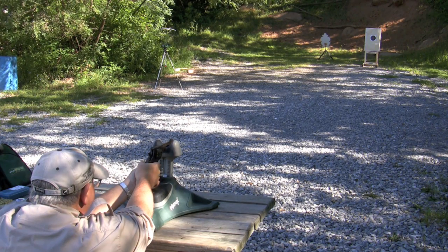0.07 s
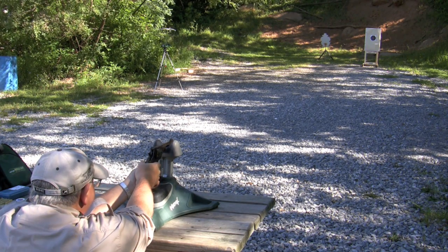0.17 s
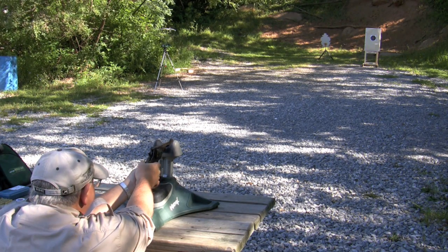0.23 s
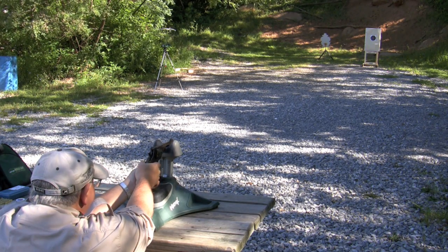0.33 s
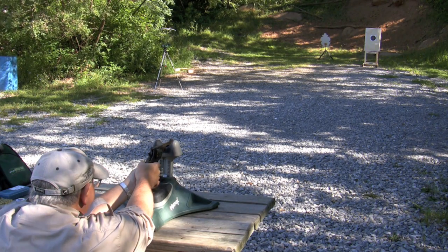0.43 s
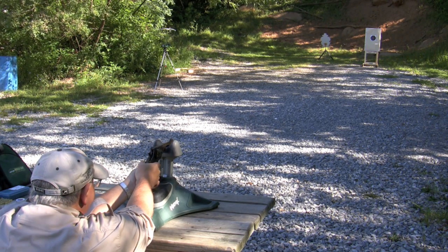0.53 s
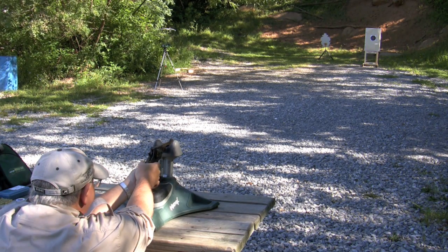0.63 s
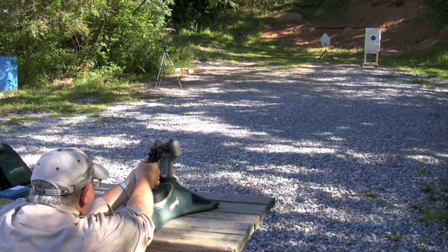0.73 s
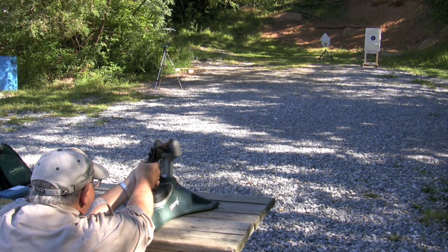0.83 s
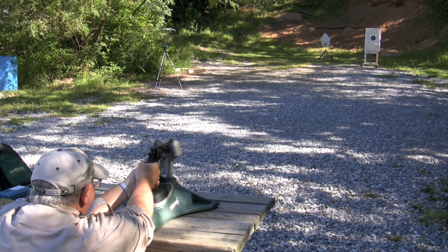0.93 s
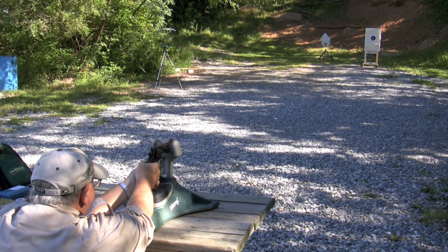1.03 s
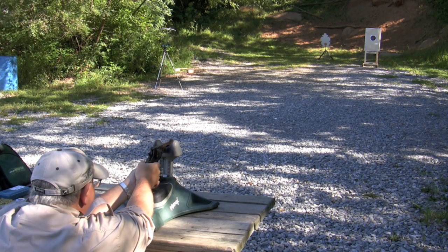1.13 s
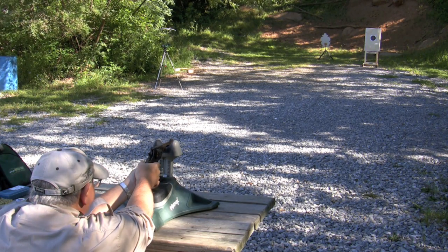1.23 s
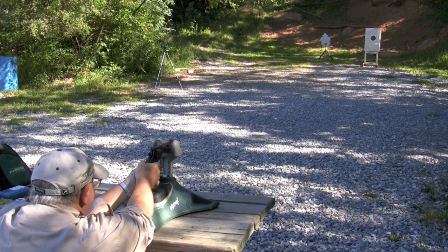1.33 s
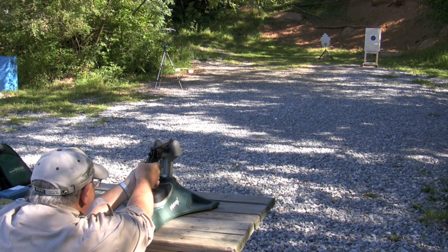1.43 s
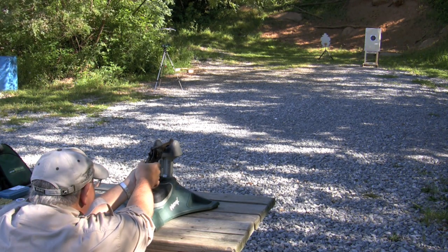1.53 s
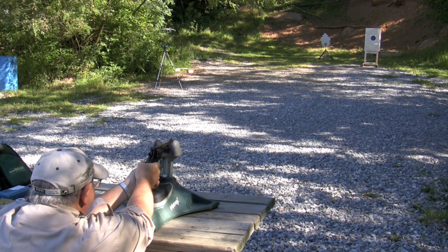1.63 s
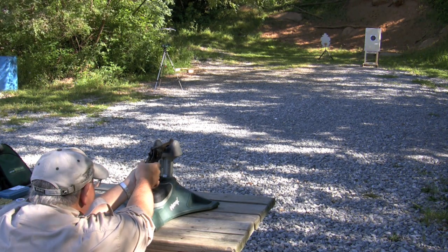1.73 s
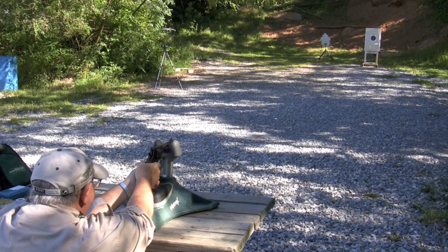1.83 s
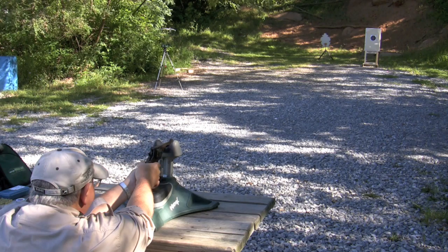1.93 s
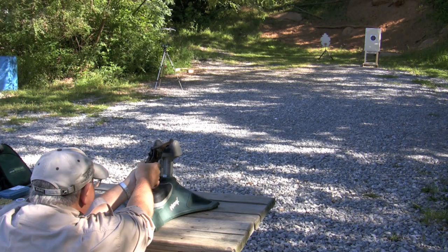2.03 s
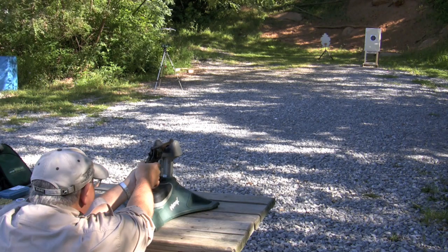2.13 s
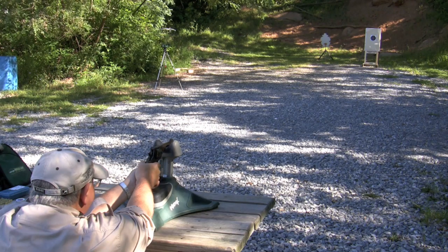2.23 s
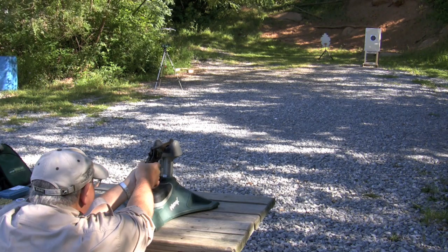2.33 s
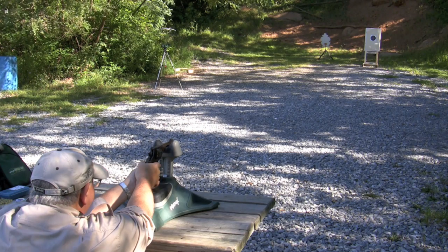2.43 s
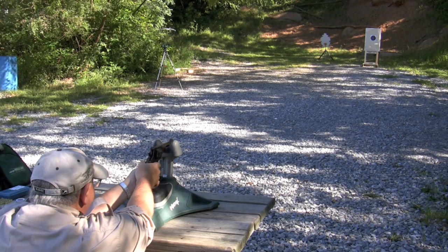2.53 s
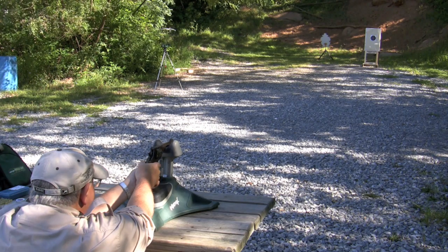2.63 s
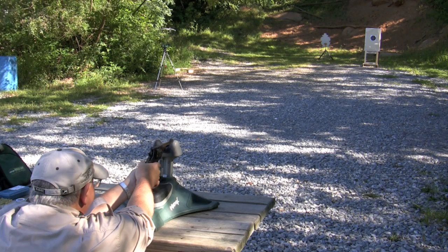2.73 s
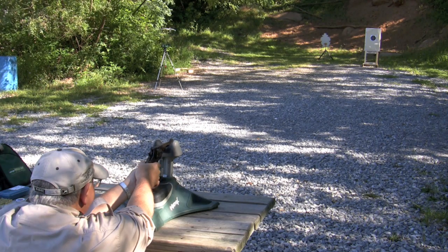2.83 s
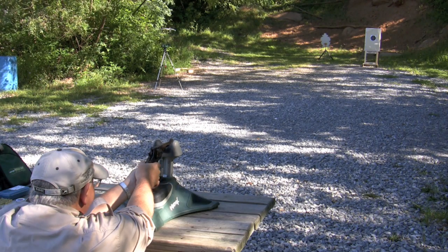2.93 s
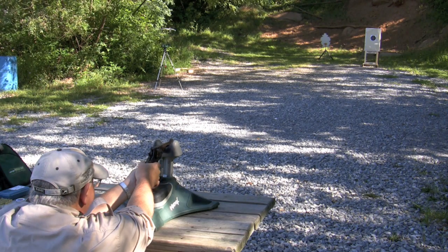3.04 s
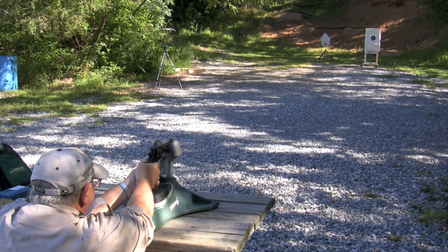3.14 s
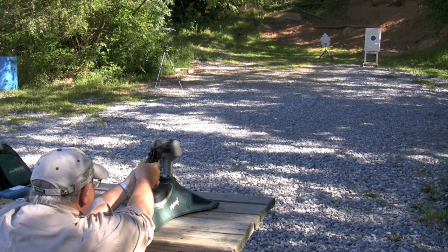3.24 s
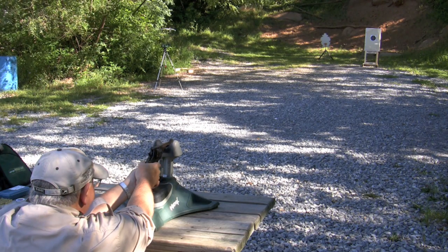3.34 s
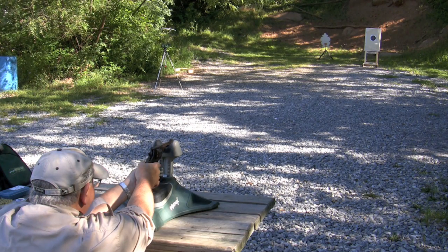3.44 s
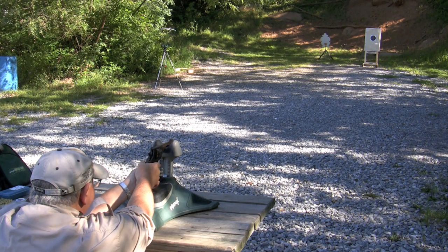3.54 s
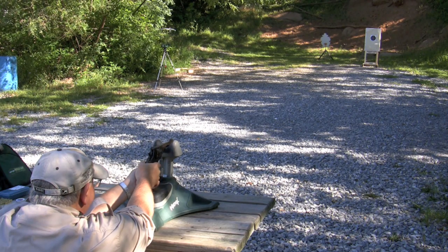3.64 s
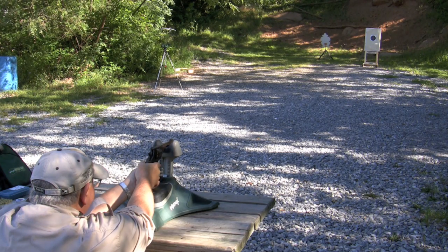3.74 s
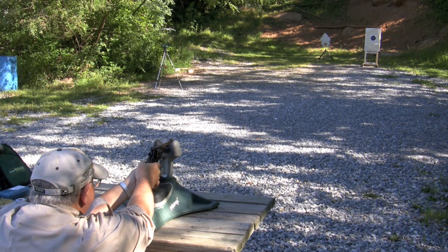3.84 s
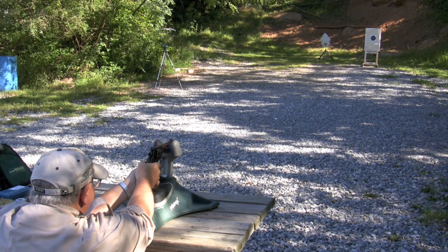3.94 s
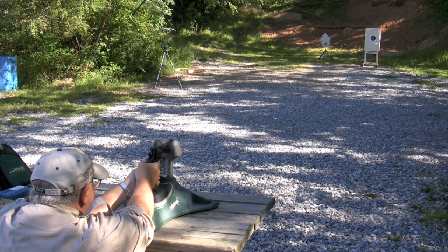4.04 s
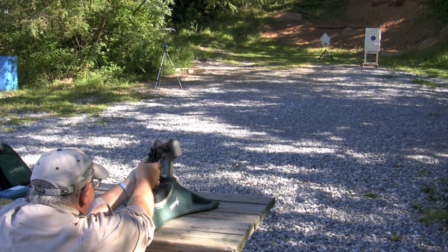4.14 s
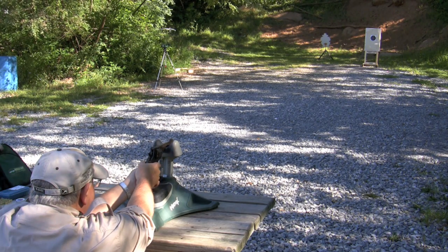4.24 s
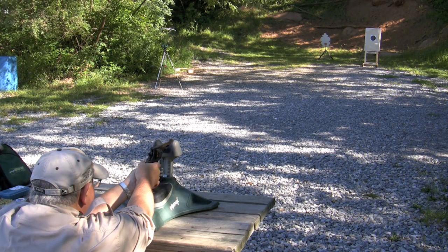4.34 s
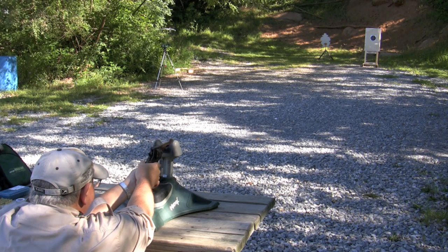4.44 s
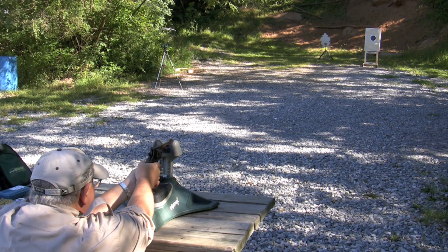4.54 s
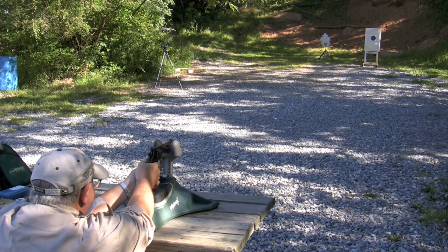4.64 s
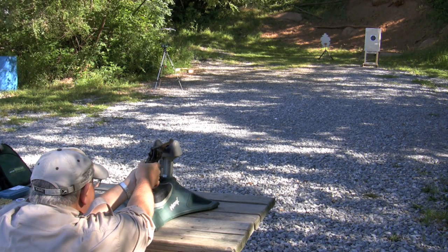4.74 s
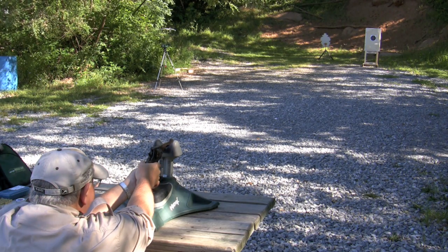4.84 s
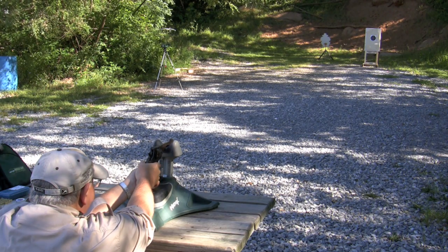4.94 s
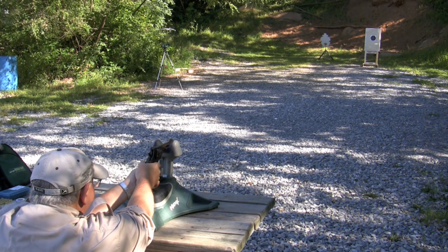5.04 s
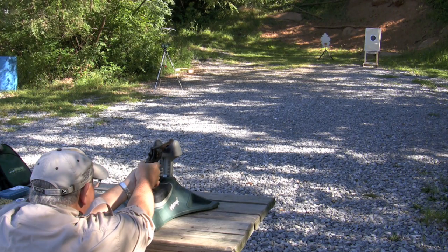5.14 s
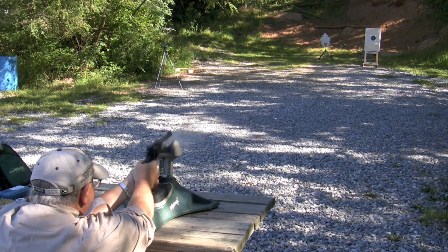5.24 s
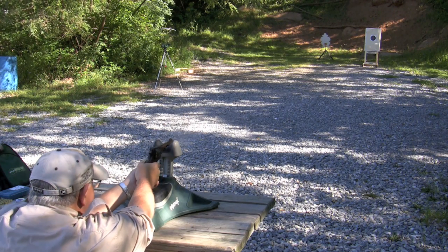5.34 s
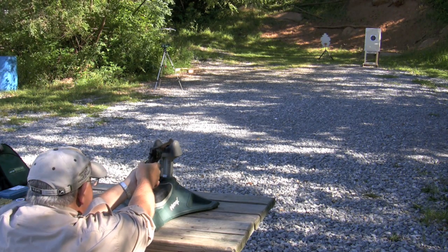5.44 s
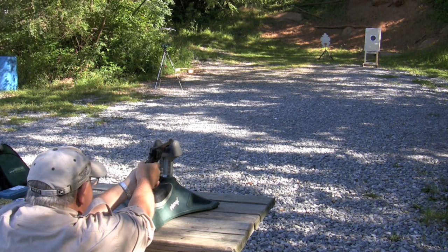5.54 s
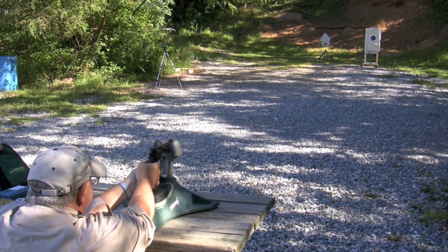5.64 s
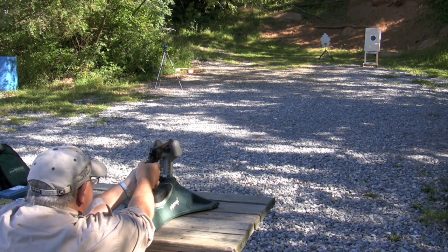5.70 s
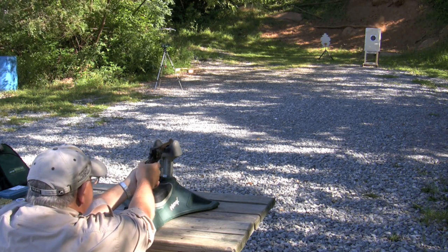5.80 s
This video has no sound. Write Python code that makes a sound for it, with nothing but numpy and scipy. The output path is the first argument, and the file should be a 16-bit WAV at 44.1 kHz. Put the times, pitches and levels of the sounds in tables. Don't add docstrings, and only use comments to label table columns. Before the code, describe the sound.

At a wooded outdoor shooting range, a nearby camera microphone picks up steady cicada buzz, several crickets chirping in separate rhythms, soft leaf hiss and a faint low aircraft drone. Just after five seconds a revolver fires once, hard and distorted, and dense slapping echoes roll back from boards, trees and an earth bank until the end.

```python
import sys
import numpy as np
from scipy import signal
from scipy.io import wavfile
from scipy.ndimage import uniform_filter1d

SR = 44100
rng = np.random.default_rng(int(sys.argv[2]) if len(sys.argv) > 2 else 0)


def waveform_to_disk(signal):
    frames = np.transpose(np.atleast_2d(signal))
    scaled = np.clip(frames, -1, 1) * 32767
    samples = np.round(scaled).astype(np.int16)
    wavfile.write(sys.argv[1], SR, samples)


def voltage_ratio(level):
    return 10 ** (np.asarray(level, float) / 20)


N = 258867
SHOT_S, WOODS_S = 5.3362, 5.344

# (frequency [Hz], likeness [0-1])
BACKGROUND_LIKENESS = [(60, 0.92), (130, 0.89), (290, 1), (640, 0.58), (1410, 0.32), (3100, 0.63),
                       (6820, 0.83), (15000, 0.72)]
# (frequency [Hz], likeness [0-1])
WOODS_LIKENESS = [(60, 1), (180, 1), (550, 0.87), (1650, 0.64), (4970, 0.96), (15000, 1)]


def evened(x):
    return x / np.sqrt(np.mean(x ** 2) + 1e-20)


def read(points, hz):
    f, value = np.transpose(points)
    return np.interp(np.log(hz + 1), np.log(f + 1), value)


def add(mix, s, sound, pan_db=0):
    part = mix[:, max(round(s * SR), 0):][:, :sound.shape[-1]]
    panned = sound * voltage_ratio(np.array([[.5], [-.5]]) * pan_db)
    part += panned[:, :part.shape[1]]


def grains(length, per_s, spread_db):
    size = voltage_ratio(spread_db * np.minimum(rng.exponential(1, (2, length)), 4))
    struck = rng.random((2, length)) < per_s / SR
    return size * rng.standard_normal((2, length)) * struck


def coloured(pair, shape_db, likeness, size):
    hz, s, z = signal.stft(pair, SR, nperseg=size, noverlap=size * 3 // 4)
    c = np.clip(read(likeness, hz), 0, 1)[:, None]
    mid = z[0] * np.sqrt((1 + c) / 2)
    side = z[1] * np.sqrt((1 - c) / 2)
    z = np.array([mid + side, mid - side]) * voltage_ratio(shape_db(hz[:, None], s))
    sound = signal.istft(z, SR, nperseg=size, noverlap=size * 3 // 4)[1]
    return evened(sound[:, :pair.shape[1]])


def patches(hz, s, bins, frames):
    field = rng.standard_normal((len(s), len(hz))).T
    return evened(uniform_filter1d(uniform_filter1d(field, bins, 0), frames, 1))


def hiss():
    # (frequency [Hz], relative density [dB per Hz])
    hiss_spectrum = [(300, -4), (700, -2.5), (1500, -6.5), (3000, -9.5), (6000, -6.5), (8800, -21),
                     (10400, -16.5), (13000, -24), (15700, -54)]
    noise = rng.standard_normal((2, N))
    return voltage_ratio(-56) * coloured(noise, lambda hz, s: read(hiss_spectrum, hz), BACKGROUND_LIKENESS, size=1024)


def aircraft():
    # (frequency [Hz], relative density [dB per Hz])
    drone_spectrum = [(20, -44), (40, -2.5), (70, -8), (120, 2), (220, 0.5), (340, -6.5), (480, -15.5),
                      (700, -32), (1200, -38.5)]
    # (time [s], level [dB])
    flight = [(0, -46), (1.0, -43), (2.0, -45), (2.6, -45), (3.3, -46), (5.3, -45.5)]
    bounce_s = .00881

    def shape(hz, s):
        comb = abs(1 + 0.56 * np.exp(2j * np.pi * hz * bounce_s))
        return read(drone_spectrum, hz) + 20 * np.log10(comb) + 1.5 * patches(hz, s, 3, 6)

    roar = coloured(rng.standard_normal((2, N)), shape, BACKGROUND_LIKENESS, size=2048)
    return voltage_ratio(np.interp(np.arange(N) / SR, *np.transpose(flight))) * roar


def cicadas():
    # (frequency [Hz], relative density [dB per Hz])
    buzz_spectrum = [(3300, -39), (3900, -29), (4200, -15.5), (4900, -7), (5220, 0), (5420, -0.5),
                     (5640, 0), (6000, -3), (7020, -5.5), (7800, -11.5), (8000, -10.5), (8290, -19),
                     (8530, -25.5), (8680, -55)]

    def shape(hz, s):
        peak_db = 3 / (1 + ((hz - 5220) / 50) ** 2)
        return read(buzz_spectrum, hz) + peak_db + 1.2 * patches(hz, s, 3, 12)

    clicks = grains(N, 15000, spread_db=-1.0)
    return voltage_ratio(-41.5) * coloured(clicks, shape, BACKGROUND_LIKENESS, size=512)


def stroke(length, hz, rise_hz=0, fall_hz=0, per_s=0, depth=0, sweep_hz=0, rough=0.27):
    u = np.linspace(0, 1, round(length * SR))
    beat = per_s * length * u + rng.uniform(0, 0.32)
    pitch = hz - rise_hz * np.maximum(1 - u / 0.37, 0) ** 2
    pitch -= fall_hz * np.maximum(u / 0.557 - .4 / .6, 0) ** 2
    pitch += sweep_hz * ((beat + .5) % 1 - .5)
    throb = 1 - np.clip(depth, 0, 1) * np.sin(np.pi * beat) ** 2
    waver = 1 + rough * evened(uniform_filter1d(rng.standard_normal(len(u)), 200))
    note = np.sqrt(2) * np.sin(2 * np.pi * (np.cumsum(pitch) / SR + rng.random()))
    return note * throb * waver * np.sin(np.pi * u) ** 0.35


def tree_crickets(out):
    # (pitch [Hz], level [dB])
    voices = [(3380, -6), (3470, -3), (3550, -1), (3610, 0), (3680, -1), (3760, -4)]
    first_s, period_s = .3, .381
    for k in range(15):
        for hz, voice_db in voices:
            trill = stroke(0.27, hz * rng.uniform(0.95, 1.02), per_s=41, depth=0.53, sweep_hz=150, rough=0.73)
            add(out, first_s + k * period_s - .13, voltage_ratio(voice_db - 70.5) * trill, pan_db=-2.0)


def grass_crickets(out):
    # (pitch [Hz], first chirp [s], period [s], level [dB], left over right [dB])
    singers = [(4780, .032, .319, -57, -7), (5640, .046, .2623, -50, 8)]
    # (time [s], level [dB])
    turning = [(.053, -47), (.352, -47), (.646, -48), (.946, -46.5), (1.246, -43), (1.555, -47),
               (1.848, -49), (2.165, -44), (2.45, -46), (2.738, -48), (3.032, -44), (3.336, -45.5),
               (3.655, -48), (3.942, -49), (4.26, -45.5), (4.534, -47), (4.844, -47), (5.176, -44.5)]
    chirp_s = .055

    def chirp(hz):
        return stroke(chirp_s, hz, rise_hz=80, fall_hz=60.3, per_s=63, depth=0.43, rough=.3)

    for hz, first_s, period_s, db, pan_db in singers:
        for k in range(22):
            level = voltage_ratio(db + 3.5 + rng.standard_normal())
            add(out, first_s + k * period_s - chirp_s / 2, level * chirp(hz), pan_db)
    for s, db in turning:
        add(out, s - chirp_s / 2, voltage_ratio(db + 2.5) * chirp(5220))


def hedge_cricket(out):
    # (time [s], level [dB])
    phrases = [(.033, -56.5), (.712, -52), (1.511, -57), (2.276, -54), (3.66, -54), (4.365, -55),
               (5.029, -56)]
    strokes_db = [-2, 4, 3, 0]
    gap_s, stroke_s = .054, .022
    for start, phrase_db in phrases:
        for k, db in enumerate(strokes_db):
            note = stroke(1.3 * stroke_s, 4270, rise_hz=40, fall_hz=90, rough=.5)
            add(out, start + k * gap_s - .7 * stroke_s, voltage_ratio(phrase_db + db - 2.2) * note, pan_db=-1.0)


def near_cricket(out):
    # (time [s], level [dB], slowness [ratio])
    phrases = [(.641, -46, 0.98), (1.49, -44.5, 1.0), (2.216, -47.5, 1.0), (3.032, -46, 1.02),
               (4.692, -45.5, 1.05)]
    # (time after first stroke [s], level [dB], length [s])
    strokes = [
        (0, -1, .021),
        (.042, 0.5, .03),
        (0.089, 2.5, .03),
        (.141, 3, .031),
    ]
    for start, phrase_db, slow in phrases:
        for after, db, length in strokes:
            short = length < .025
            note = stroke(length, 4400 - 150 * short, rise_hz=230 - 280 * short,
                          fall_hz=320 - 150 * short, rough=.35)
            add(out, start + slow * after - length / 2, voltage_ratio(phrase_db + db - 2.5) * note, pan_db=-1.0)


def crickets():
    out = np.zeros((2, N))
    tree_crickets(out)
    grass_crickets(out)
    hedge_cricket(out)
    near_cricket(out)
    trail = rng.standard_normal((2, 3000)) * voltage_ratio(-60 * np.arange(3000) / SR / 0.092)
    trail /= np.linalg.norm(trail[0])
    return out + voltage_ratio(-10.5) * signal.fftconvolve(out, trail, axes=1)[:, :N]


def echoes():
    # (time [s], peak level [dB], ring [Hz], left over right [dB])
    hard_returns = [(5.375, -11, 2800, -5), (5.405, 0.5, 1860, 2), (5.4457, 7, 1600, 12),
                    (5.4456, -1.5, 850, 12), (5.447, -10, 247, -4), (5.4507, -6, 4000, 2),
                    (5.4595, -2, 6500, 3), (5.495, 1, 1140, 10), (5.4963, -0.5, 6500, 9),
                    (5.503, -2, 2960, 9), (5.5031, -4, 6500, 0), (5.503, -8.5, 11000, 2),
                    (5.548, -1, 740, -1), (5.55, -7, 334, 0), (5.575, -10.5, 248, 0), (5.599, -6, 1610, 0),
                    (5.636, -3, 1680, -3), (5.664, 5, 1750, -2), (5.828, -1, 1630, 2),
                    (5.836, -1.5, 14500, 3), (5.836, -10, 11500, 0), (5.837, -10, 8500, 4),
                    (5.841, -4, 6450, 4), (5.841, -12, 10000, 5)]
    out, t = np.zeros((2, N)), np.arange(1500) / SR
    for s, db, hz, pan_db in hard_returns:
        t60_s = 0.014 * (1000 / hz) ** 0.63
        rough = 1 + 0.47 * evened(np.convolve(rng.standard_normal(len(t)), np.hanning(24), "same"))
        rise = np.sin(np.pi / 2 * np.minimum(t * hz, 1)) ** 2
        add(out, s, voltage_ratio(db - 60 * t / t60_s) * rise * np.sin(2 * np.pi * hz * t) * rough, pan_db)
    return out


def trunks(t):
    def ring(hz, s):
        return -15 * np.log10(1 + ((hz - 1620) / 300) ** 4) - 60 * (hz / 10000) ** 2 + 0 * s

    bank_s, bank_width_s = 5.75, .09
    level_db = -15.5 - 23 * np.exp((WOODS_S - t) / 0.047)
    level_db += 8.5 * np.exp(-((t - bank_s) / bank_width_s) ** 2)
    clicks = grains(len(t), 5000, spread_db=.5)
    return voltage_ratio(level_db) * coloured(clicks, ring, WOODS_LIKENESS, size=512)


def leaves(t):
    # (time [s], level [dB])
    waves = [(5.344, 4), (5.351, -12), (5.43, -13), (5.5, -14.5), (5.57, -11), (5.62, -12.5), (5.66, -9.5),
             (5.76, -8.5), (5.83, -10.5)]
    when, level_db = np.transpose(waves)

    def shape(hz, s):
        now = s + WOODS_S
        travel_s = now - SHOT_S
        top_hz = np.maximum(16300 - 8000 * travel_s * (now < 5.82), 13600)
        top_hz = top_hz - 800 * np.repeat(rng.random(len(s)), 8)[:len(s)]
        db = (-2.5 - 31 * np.sqrt(travel_s)) * np.log2(1 + (hz / 5000) ** 2) / 2
        bass_db = -14 + 18 * travel_s + 1.17 * np.minimum(np.interp(now, when, level_db) + 13.5, 3)
        db = db + bass_db / (1 + (hz / 1000) ** 3)
        db = db - 6 / (1 + ((hz - 1210) / 78) ** 2)
        db = db - 16 * np.log2(np.maximum(290 / (hz + 10), 1)) - 7 * (hz / 12000) ** 4
        db = db - 60 * (hz > top_hz) + 1.93 * patches(hz, s, 3, 12)
        return db - 10 * np.log10(np.mean(voltage_ratio(db) ** 2, 0))

    clicks = grains(len(t), 25000, spread_db=0)
    return voltage_ratio(np.interp(t, when, level_db)) * coloured(clicks, shape, WOODS_LIKENESS, size=512)


def woods():
    out = np.zeros((2, N))
    t = WOODS_S + np.arange(N - round(WOODS_S * SR)) / SR
    add(out, WOODS_S, leaves(t))
    add(out, WOODS_S, trunks(t))
    return out


def shot():
    # (frequency [Hz], relative density [dB per Hz])
    blast_spectrum = [(60, -3), (200, -7), (450, -6), (800, 1), (1500, 0), (3000, -7.5), (6000, -10),
                      (10000, -17), (16000, -38)]
    tick_spectrum = [(1000, 0), (3000, 3), (8000, -3), (15000, -23)]
    out, t = np.zeros((2, N)), np.arange(2048) / SR
    tick = coloured(rng.standard_normal((2, 2048)), lambda hz, s: read(tick_spectrum, hz),
                    [(1, .9), (2, 1.0)], size=256)
    add(out, 5.329, voltage_ratio(-23.5 - 60 * t / 0.022) * tick)
    roar = coloured(rng.standard_normal((2, 2048)), lambda hz, s: read(blast_spectrum, hz),
                    [(1, 0.6), (2, 0.98)], size=256)
    roar *= voltage_ratio(16 - 500 * t - 12000 * np.maximum(t - .0085, 0)) * np.minimum(t / .0006, 1) ** 2
    push = -voltage_ratio(4.5) * np.minimum(t / 0.0006, 1) * np.clip((.0062 - t) / 0.002, -.15, 1)
    push *= np.clip((.012 - t) / .002, 0, 1)
    add(out, SHOT_S, roar + push)
    return out


def scene():
    after_s = np.arange(N) / SR - SHOT_S
    duck_db = -6 + 11 * (1 - np.exp(-np.maximum(after_s, 0) / .09))
    duck = voltage_ratio((after_s > 0) * duck_db)
    background = hiss() + aircraft() + cicadas() + crickets()
    high_pass = signal.butter(2, 130, "high", fs=SR, output="sos")
    returns = signal.sosfilt(high_pass, echoes() + woods())
    return background * duck + returns + shot()


def band_limit(x):
    return signal.sosfilt(signal.butter(12, 15650, fs=SR, output="sos"), x)


def record(dry):
    # (time [s], gain change [dB])
    gain_steps = [
        (5.3785, -5),
        (5.4518, -4),
    ]
    gain_db = sum(db * (np.arange(N) > s * SR) for s, db in gain_steps)
    gain = voltage_ratio(uniform_filter1d(gain_db * 1., 40) + np.array([[.2], [-.2]]))
    clipped = np.clip(dry * gain, -.93, .93)
    sagged = signal.lfilter(*signal.butter(1, 22, "high", fs=SR), clipped)
    return band_limit(sagged)


dry = scene()
out = record(dry)
waveform_to_disk(out)
```